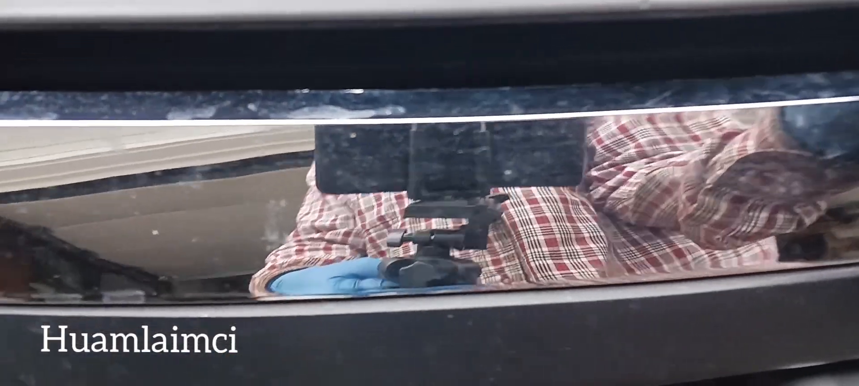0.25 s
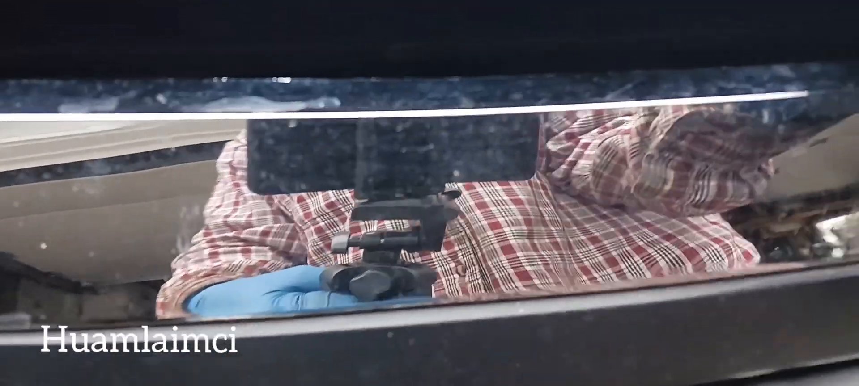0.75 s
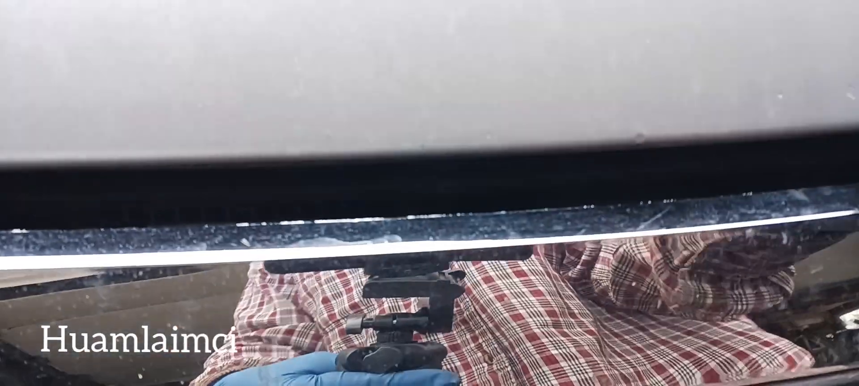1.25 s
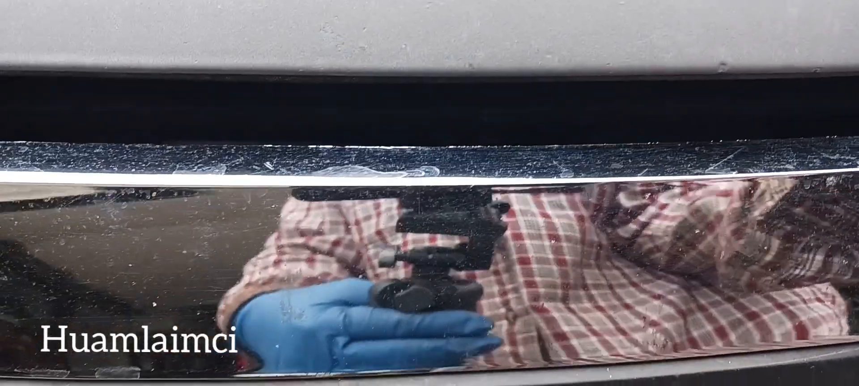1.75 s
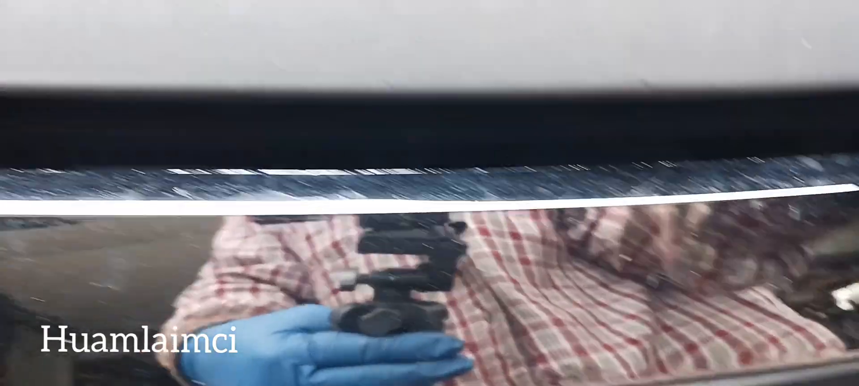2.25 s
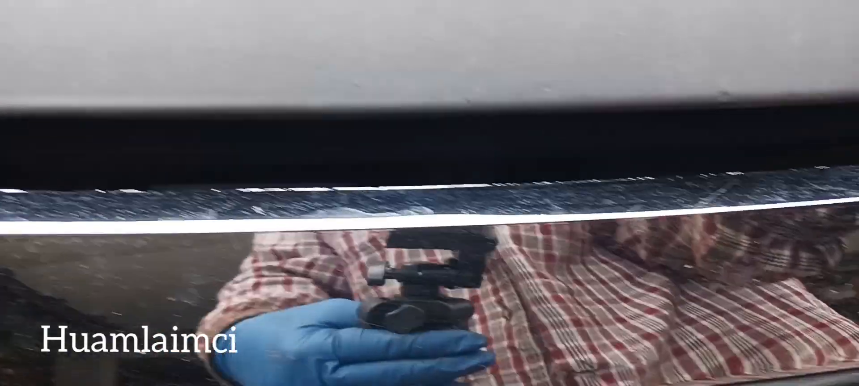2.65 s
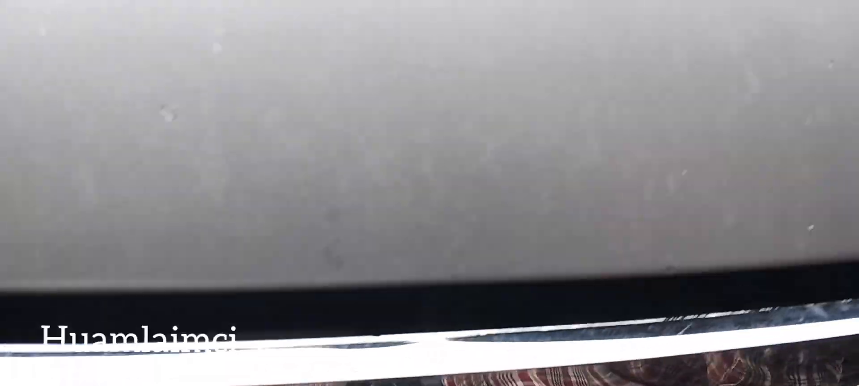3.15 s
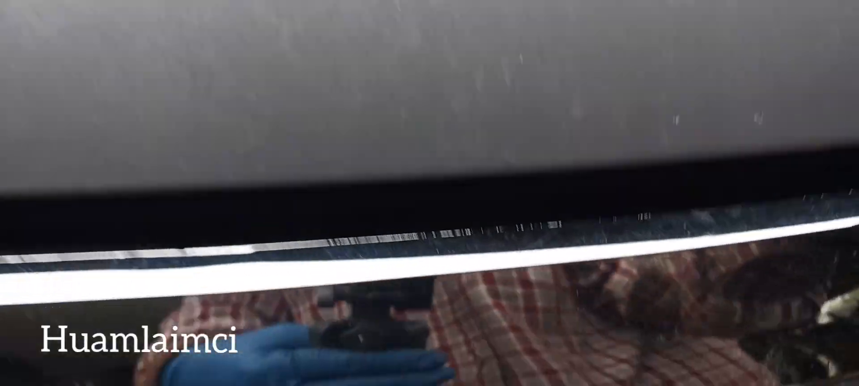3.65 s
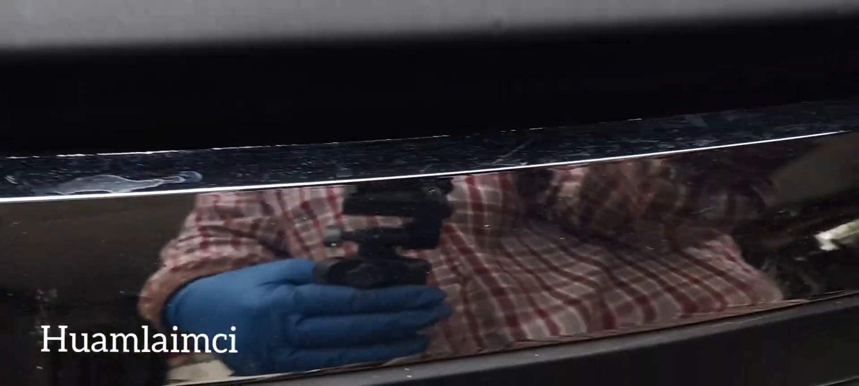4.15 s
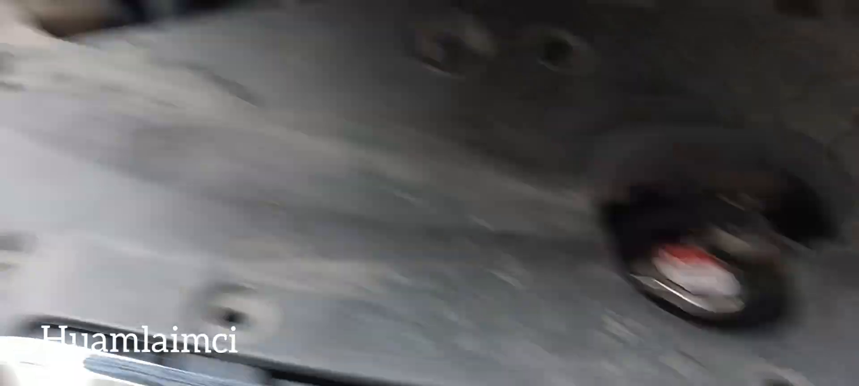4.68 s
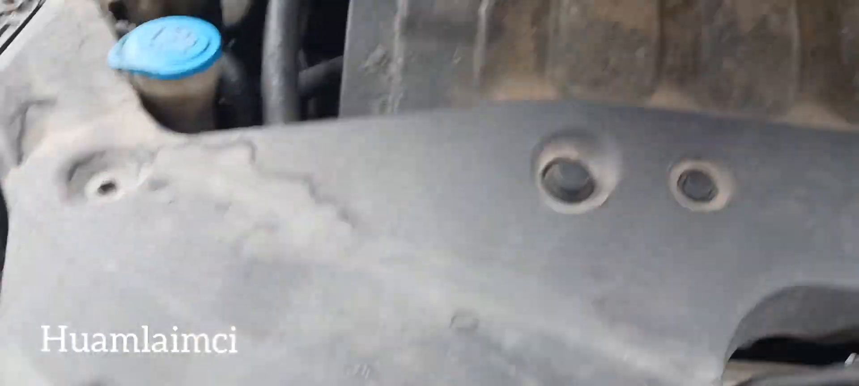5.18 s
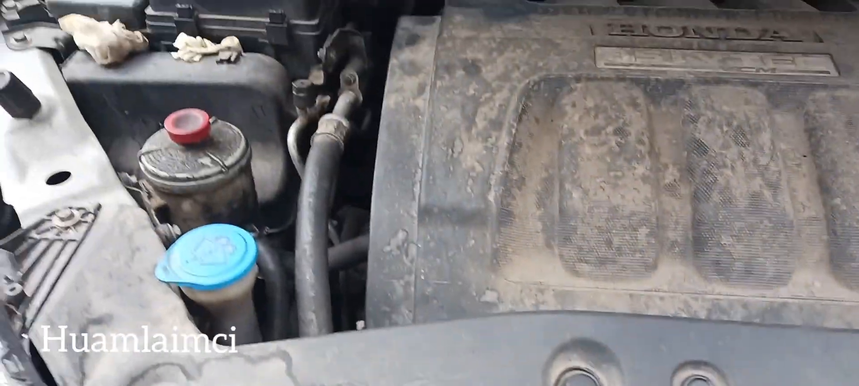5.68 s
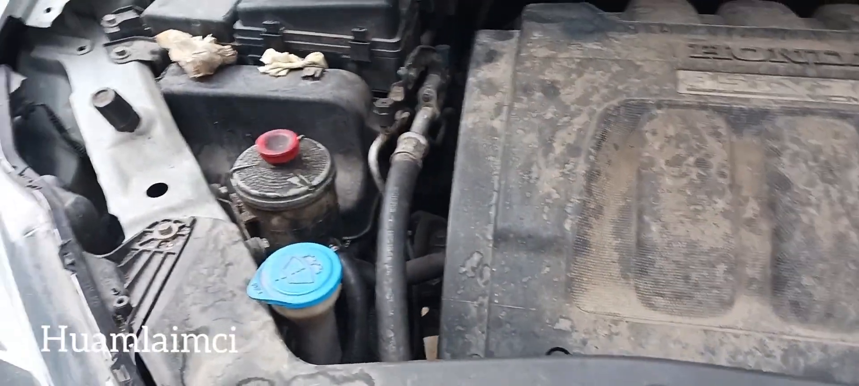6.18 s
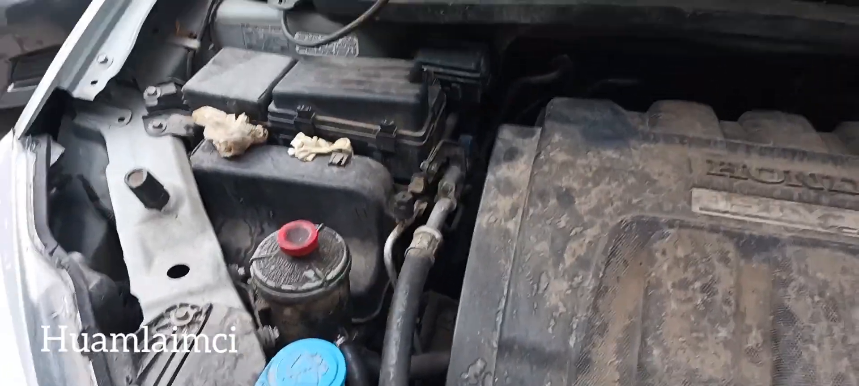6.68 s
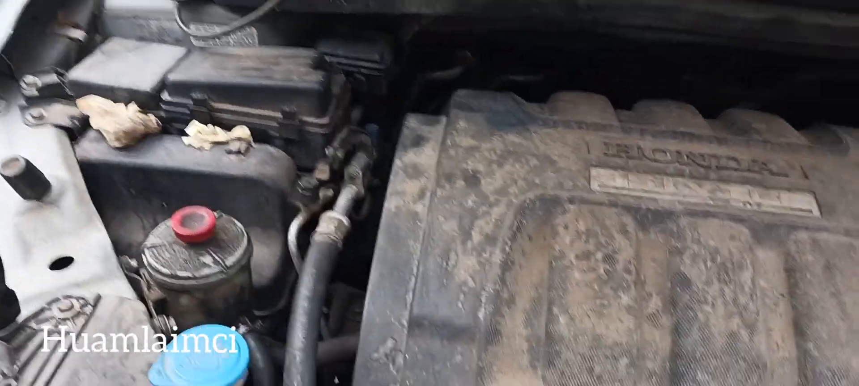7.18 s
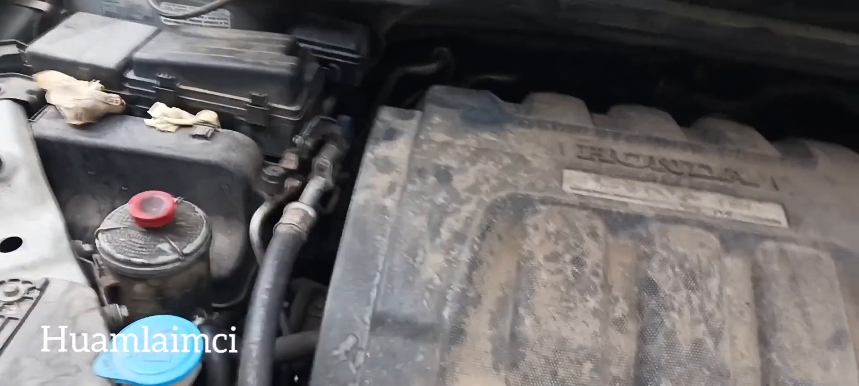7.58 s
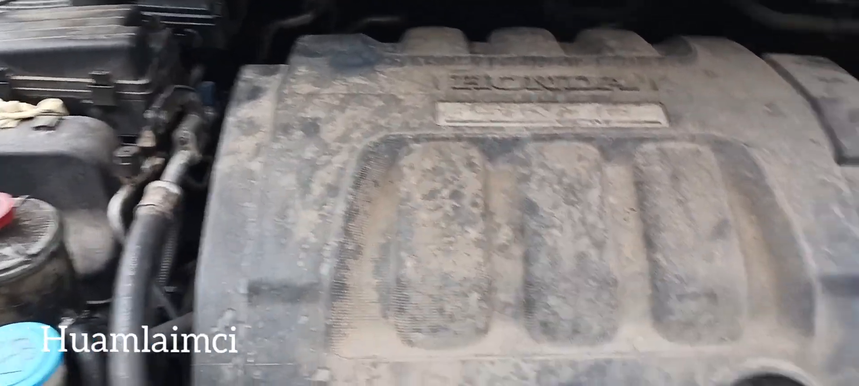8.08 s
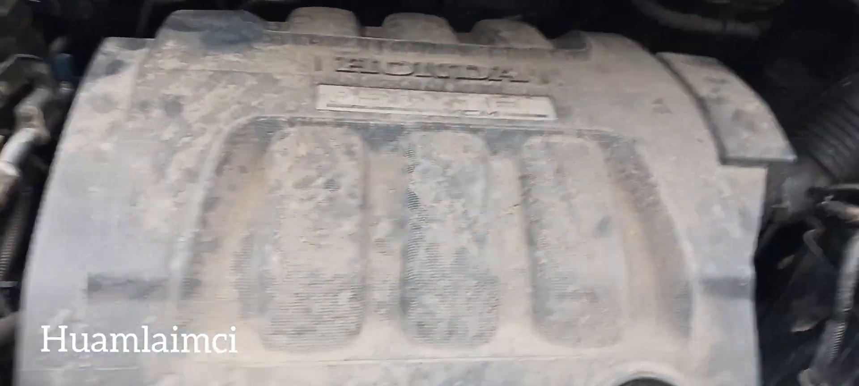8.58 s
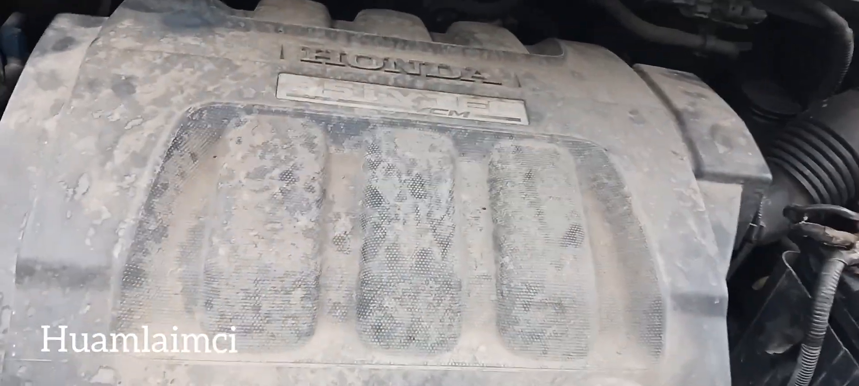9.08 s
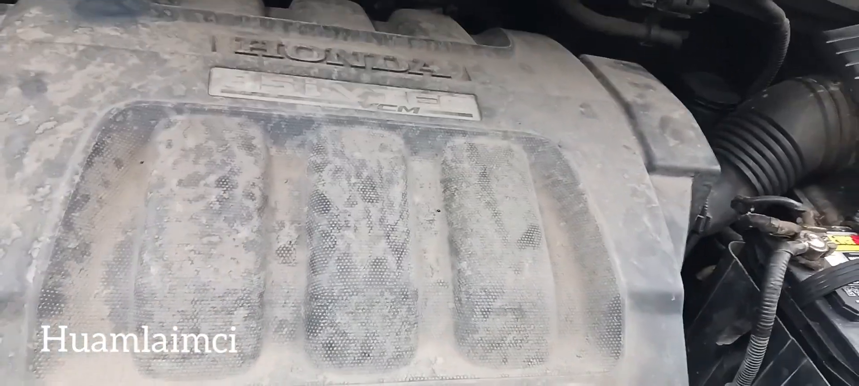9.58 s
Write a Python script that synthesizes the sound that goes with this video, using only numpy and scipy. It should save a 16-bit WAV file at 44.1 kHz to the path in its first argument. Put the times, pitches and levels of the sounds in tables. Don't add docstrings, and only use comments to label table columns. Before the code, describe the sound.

Outdoors, wind rumbles unevenly on a close handheld stereo microphone over soft distant traffic. At 0 s a lever's spring is already ringing, bright and metallic, slightly left. A heavy hollow hood thump lands at 0.5 s, then a sharper double clunk around 0.8 to 0.95, right of center. The lever twangs again at 1.3. Duller, bouncing thuds come at 1.9, 2.25, 2.55 and 2.85, with a low swaying hum. A strong ringing clank hits at 3.2 and a softer spring snap at 3.6. At 4.1 a thud leads into a rapid, bright release clatter near 4.3, with loose ticks until 4.8. Brief hinge squeaks sound about 5.1. Afterwards it is quieter: faint bird whistles around 6.2 to 7.7, a barely audible insect buzz from 2.75 to 6.7, sharp small ticks near 7.5 and 8.7, and light scuffs up to 9.7.

```python
import sys
import numpy as np
from scipy import signal
from scipy.fft import rfft, irfft
from scipy.io import wavfile
from scipy.ndimage import uniform_filter1d

SR = 44100
rng = np.random.default_rng(int(sys.argv[2]) if len(sys.argv) > 2 else 0)


def volts_from_decibels(level):
    exponent = np.asarray(level, float) / 20
    return 10 ** exponent


def log_audio(samples):
    frames = np.atleast_2d(samples).T
    limited = np.clip(frames, -1, 1)
    pcm = np.round(limited * 32767).astype(np.int16)
    wavfile.write(sys.argv[1], SR, pcm)


N = 433503


def evened(x):
    return x / np.sqrt(np.mean(x ** 2) + 1e-20)


def read(points, hz):
    f, value = np.transpose(points)
    return np.interp(np.log(hz + 1), np.log(f + 1), value)


def columns(rows, t):
    s, *rest = np.transpose(rows)
    return [np.interp(t, s, c) for c in rest]


def add(mix, s, sound, pan_db=0):
    part = mix[:, round(s * SR):][:, :sound.shape[-1]]
    lean = volts_from_decibels(np.array([[pan_db / 2], [-pan_db / 2]]))
    part += (sound * lean)[:, :part.shape[1]]


def wander(count, smooth):
    once = uniform_filter1d(rng.standard_normal(count), int(smooth))
    return evened(uniform_filter1d(once, int(smooth)))


def stroke(length, db, fade_db, rise, fall):
    t = np.arange(0, length, 1 / SR)
    ends = np.clip(np.minimum(t / rise, (length - t) / fall), 0, 1)
    return t, volts_from_decibels(db + fade_db * t / length) * np.sin(np.pi / 2 * ends) ** 2


def two_ports(left, other, same, hz):
    like = np.clip(read(same, hz), -1, 1).reshape((-1,) + (1,) * (left.ndim - 1))
    return left, like * left + np.sqrt(1 - like ** 2) * other


# (f/Hz, left-right level/dB)
PORT_TILT = [(60, 3.5), (180, 1), (550, 3.5), (1650, 6), (4970, 3), (15000, 10)]


def field(spectrum, same, patchy_db, size):
    frames, hz = 4 * N // size + 5, np.fft.rfftfreq(size, 1 / SR)
    a, b, c, d, patches = rng.standard_normal((frames, len(hz), 5), dtype=np.float32).T
    patches = evened(uniform_filter1d(uniform_filter1d(patches, 8, axis=0), 10, axis=1))
    z = np.array(two_ports(a + 1j * b, c + 1j * d, same, hz))
    z = z * volts_from_decibels(read(spectrum, hz)[:, None] + patchy_db * patches)
    z = z * volts_from_decibels(np.multiply.outer([0.5, -0.5], read(PORT_TILT, hz)))[:, :, None]
    return evened(signal.istft(z, nperseg=size, noverlap=3 * size // 4)[1][:, :N])


def modes(table, t, spread_db, blur, count=4):
    hz, db, t60 = np.transpose(table)[:, :, None]
    luck = rng.standard_normal((2, 2, len(table)))
    phase = 2 * np.pi * rng.random((count, len(table), 1))
    near = hz * (1 + blur * rng.standard_normal((count, len(table), 1)))
    lines = np.sin((2 * np.pi * near * t + phase).astype(np.float32)).sum(axis=0) / np.sqrt(count)
    rings = volts_from_decibels(db - 60 * t / t60) * lines
    caught = volts_from_decibels(spread_db * (luck[0, :1] + 0.5 * luck[1]))
    return caught @ rings / np.sqrt(np.sum(volts_from_decibels(2 * db)))


BANDS_HZ = np.geomspace(60, 15000, 12)
# (f/Hz, t60/s)
RING_T60 = [(100, 0.52), (300, 0.49), (800, 0.22), (2000, 0.38), (5000, 0.24), (12000, 0.12)]
# (f/Hz, t60/s)
CRACK_T60 = [(300, 0.096), (1500, 0.076), (6000, 0.03), (14000, 0.06)]
# (f/Hz, level per band/dB)
COLOUR = [(120, -7.5), (250, 0.53), (500, 0), (900, -3.5), (2000, -2), (4000, 4), (8000, -7.5), (12500, 0),
          (15000, -0.5)]
# (f/Hz, left-right level/dB)
HIT_TILT = [(60, -1), (180, -5), (550, -6), (1650, 0.5), (4500, -0.5), (8000, 2.5), (12000, 6.5)]
# (f/Hz, likeness 0-1)
HIT_SAME = [(60, .9), (180, .93), (550, .5), (1100, .25), (3000, .55), (15000, .6)]
PORT_LAG_S = 0.00011
SNAP_DB, SNAP_T60 = 3.5, 0.008
ECHO_DB, ECHO_T60 = -25.5, 0.95
SWELL_CYCLES = 0.6


def blow(boom_db, knock_db, crack_db, stretch, tail_db, knock_hz, count):
    t, hz = np.arange(count) / SR, np.fft.rfftfreq(count, 1 / SR)
    left, other = rfft(rng.standard_normal((2, count)))
    near, far = two_ports(left, other, HIT_SAME, hz)
    ports = np.array([near * np.exp(-2j * np.pi * hz * PORT_LAG_S), far])
    ports = ports * volts_from_decibels(3.1 * wander(len(hz), 45.0 * count / SR))
    rattle = volts_from_decibels(1.1 * wander(count, 90))
    tilt_db = read(HIT_TILT, BANDS_HZ) - read(HIT_TILT, 340)
    lean = volts_from_decibels(np.multiply.outer(tilt_db, [[0.5], [-0.5]]))
    place = np.interp(np.log(hz + 1), np.log(BANDS_HZ), np.arange(len(BANDS_HZ)))
    air_db = crack_db + 0.17 * (crack_db - boom_db)
    strength = [(300, boom_db), (knock_hz, knock_db), (3500, crack_db), (11000, air_db)]
    level_db = read(strength, BANDS_HZ) + read(COLOUR, BANDS_HZ)
    contact = 0.00021 + 0.0043 * np.clip((boom_db - crack_db) / 30, 0, 1)
    snap = volts_from_decibels(SNAP_DB - 60 * t / SNAP_T60)
    echo = volts_from_decibels(tail_db + ECHO_DB - 60 * t / (stretch * ECHO_T60))
    out = np.zeros((2, count))
    for k, f in enumerate(BANDS_HZ):
        window = np.cos(np.pi / 2 * np.clip(place - k, -1, 1))
        band = evened(irfft(ports * window, count))
        crack = volts_from_decibels(-60 * t / read(CRACK_T60, f))
        ring = volts_from_decibels(tail_db - 60 * t / (stretch * read(RING_T60, f)))
        swell = 1 - np.exp(-t / (contact + SWELL_CYCLES / f))
        out += volts_from_decibels(level_db[k]) * lean[k] * band * rattle * (snap + crack + ring + echo) * swell
    return out


# (t/s, level/dB)
GUSTS = [(0.0, -48), (0.3, -53), (0.5, -46.5), (1.83, -47.5), (2.79, -47), (3.6, -52.5), (4.1, -59),
         (4.3, -50), (4.7, -48.5), (5.86, -53), (6.49, -45.5), (6.71, -48), (7.47, -51), (8.02, -46),
         (8.73, -47.5), (9.01, -46), (9.5, -48)]
# (f/Hz, level per Hz/dB)
WIND = [(12, -41), (20, -13.5), (43, 1.5), (88, 0.5), (156, -29.5), (261, -21.5), (400, -29), (600, -79)]
# (f/Hz, level per Hz/dB)
AIR = [(130, -4), (250, -18.5), (570, -26.5), (1000, -18), (2250, -31.5), (3000, -41), (6500, -48),
       (14000, -42)]
# (f/Hz, likeness)
AIR_SAME = [(60, 0.32), (240, 1), (950, -0.3), (3770, 0.15), (15000, 0.22)]
AIR_DB = -63.5


def outdoors():
    gust_db, = columns(GUSTS, np.arange(N) / SR)
    rumble = field(WIND, [(30, 0.4), (150, 0.6)], 1.5, size=4096) * volts_from_decibels(3.8 * wander(N, 2100))
    wash = field(AIR, AIR_SAME, 1.4, size=1024) * volts_from_decibels(0.9 * wander(N, 9000))
    wind = volts_from_decibels(gust_db + 4.0) * evened(rumble) * volts_from_decibels(np.array([[-4.5], [1.5]]))
    return wind + volts_from_decibels(AIR_DB + 9.5) * wash


# (t/s, level/dB, left-right level/dB, clack level over the spring/dB, rise/s)
SNAPS = [
    (-0.015, -31, 6, -8.5, 0.004),
    (1.3308, -31, 4.5, -20.5, 0.004),
    (3.587, -28, 6.5, -12.5, 0.0055),
]
# (f/Hz, level/dB, t60/s)
SPRING = [(2830, -26, 0.36), (3140, -12.5, 0.4), (3450, -18, 0.66), (3630, -6.5, 0.65), (3830, -5, 0.45),
          (3900, -11, 0.43), (4360, -3.5, .3), (4490, 7, 0.021), (4930, -14.5, 0.16), (5570, -11, 0.14),
          (7130, -10, 0.17), (7500, -18, 0.38), (8350, -26, 0.19), (9400, -19, 0.27)]
# (f/Hz, level/dB, t60/s)
CLACK = [(354, -9, 0.12), (480, 18.5, 0.43), (530, 13.5, 0.46)]
SLIP_DB = [5, -5, -6, -11]
SLIP_HZ, SLIP_DROP, SLIP_S, SLIP_T60 = 3870, 0.47, 0.00377, 0.079


def lever():
    out, t = np.zeros((2, N)), np.arange(26000) / SR
    for s, db, pan_db, clack, rise in SNAPS:
        plate = modes(CLACK, t, 1.0, 0.045)
        ring = volts_from_decibels(db) * (modes(SPRING, t, 2.8, 0.021, count=10) + volts_from_decibels(clack) * plate)
        clash = 1 + 1.94 * np.exp(-t / 0.0097)
        ring = ring * clash * (1 - np.exp(-(t / 0.013) ** 2))
        slip_hz = SLIP_HZ * (1 + SLIP_DROP * np.exp(-t / SLIP_S)) * (1 + 0.031 * wander(len(t), 25))
        turns = np.cumsum(slip_hz) / SR
        squeal = sum(volts_from_decibels(h_db) * np.sin(2 * np.pi * (k + 1) * turns) for k, h_db in enumerate(SLIP_DB))
        ring = ring + volts_from_decibels(db - 0.37 * (clack + 19.0) - 60 * t / SLIP_T60) * squeal
        slap = blow(db - 20.0, db - 38.0, db - 20.0, 1.0, -4, 2800, count=len(t))
        snap = (ring + slap) * (1 - np.exp(-(t / rise) ** 2))
        add(out, max(s, 0), snap[:, round(max(-s, 0) * SR):], pan_db)
    return out


# (start t/s,
# length/s, from f/Hz, to f/Hz, level/dB)
WHISTLES = [(0.038, 0.36, 3805, 3684, -79), (1.245, 0.26, 3740, 3720, -76), (1.397, 0.44, 3690, 3630, -77),
            (2.851, 0.3, 4040, 3870, -81.5), (3.083, 0.071, 3620, 3700, -79), (6.17, .09, 3030, 2960, -84),
            (6.25, .1, 2300, 2250, -86), (6.375, .08, 2700, 2400, -82), (6.865, .16, 4120, 4010, -81),
            (6.912, 0.12, 3290, 3070, -74), (6.94, 0.42, 4060, 3820, -79), (7.2, .28, 3870, 3840, -87),
            (7.32, 0.5, 3740, 3630, -80), (7.68, 0.1, 3660, 3580, -82)]
# (start t/s, length/s, from f/Hz, to f/Hz, level/dB)
SQUEAKS = [(5.077, .07, 2405, 2317, -75.5), (5.089, 0.035, 1570, 1560, -76.5),
           (5.089, 0.094, 3320, 3130, -78), (5.174, .14, 3210, 3040, -89), (5.092, .16, 4200, 4070, -84.5),
           (7.0, 0.22, 4320, 4200, -88), (7.738, .1, 4050, 4070, -81.5), (7.813, 0.15, 4300, 4420, -88),
           (8.135, 0.096, 4230, 4340, -88)]
WHISTLE_FADE_DB, WHISTLE_EDGE_S = -2, 0.03
GLIDE_BEND = 0.77
BLUR_S, FLUTTER_S = 0.00093, 0.06
YARD_DB, YARD_T60 = -9, 0.49


def calls():
    out = np.zeros((2, N))
    for (s, length, from_hz, to_hz, db), rough in [(w, 0.2) for w in WHISTLES] + [(w, 1.2) for w in SQUEAKS]:
        t, shape = stroke(length, db, WHISTLE_FADE_DB, min(WHISTLE_EDGE_S, length / 3), 0.58 * length)
        hz = from_hz + (to_hz - from_hz) * (t / length) ** GLIDE_BEND
        waver = (0.0026 + rough * BLUR_S / length) * wander(len(t), 37.8)
        tremble = 0.0033 * np.sin(2 * np.pi * t / 0.483)
        turns = np.cumsum(hz * (1 + waver + tremble)) / SR
        tone = np.sin(2 * np.pi * (turns + rng.random() + np.array([[0], [0.12]])))
        tone = tone * volts_from_decibels(16.5 + 4.0 * wander(len(t), 710))
        flutter = 1 + (0.35 + rough * FLUTTER_S / length) * wander(len(t), 81)
        add(out, s, shape * tone * flutter)
    t = np.arange(SR // 3) / SR
    sparse = rng.random((2, len(t))) < 0.02
    yard = rng.standard_normal((2, len(t))) * sparse * volts_from_decibels(-60 * t / YARD_T60)
    echoes = signal.oaconvolve(out, yard / np.linalg.norm(yard[0]), axes=1)[:, :N]
    return volts_from_decibels(-5.0) * out + volts_from_decibels(YARD_DB) * echoes


# (t/s, crack level/dB, boom level over crack/dB, knock level over crack/dB, left-right level/dB)
TICKS = [(0.2543, -42, 8, -10, 3), (0.3387, -50, 10, -7, 2), (1.0, -39.5, 14, 23, 5),
         (1.1292, -50, -5, 8, 4.5), (1.482, -43, 9, -3, -4), (1.8783, -47.5, 19.5, -45, 0),
         (1.9905, -48.5, 24, 23.5, 0), (3.066, -44.5, -6, -4, -9), (4.055, -43, 4, 1, 1),
         (4.4581, -53, -5, 12, -6), (4.4842, -37, -14, 1, -9), (4.557, -36, -1, 3, -7),
         (4.608, -38.5, 13, 2, -5), (5.055, -58, 23, 3, -1), (5.1258, -53.5, 13, 11, -5),
         (5.371, -47.5, -14, -69, 1), (7.5073, -50.5, -1, 20, -2), (7.5396, -34.5, -5.5, -1.5, -0.5),
         (8.4867, -78.5, 47.5, -26, -12), (8.649, -38, -15, 24, -7), (8.6744, -44.5, 2, 19, 1),
         (8.788, -35, -10.5, -20, -3), (9.2751, -58.5, 11, 27.5, 0.5), (9.4586, -50.5, 1, 17, -0.5),
         (0.171, -53, 0, 3, 0), (0.261, -45, -9, -3, -1.5), (0.38, -55, -2, -12, 0),
         (4.497, -35, -10, -1, -8), (4.719, -48, 10, -8, -6), (1.682, -57, -14, -32, -3),
         (9.32, -56, -10, -30, 2), (9.019, -60, -10, -30, 0)]
TICK_RING = 0.578


def ticks():
    out = np.zeros((2, N))
    for s, db, boom, knock, pan_db in TICKS:
        tick = blow(db + boom - 18.5, db + knock - 18.5, db - 17.0, TICK_RING, -9.5, 1320, count=6144)
        add(out, s, tick, pan_db)
    return out


# (start t/s, length/s, level/dB, fade over the length/dB, f/Hz)
SWAY = [
    (0.207, 0.57, -49.5, 9.5, 83.5),
    (0.858, 0.19, -37, -5, 67),
    (1.024, 0.775, -44.5, -2.5, 82.45),
    (1.918, 1.08, -35.5, -10.5, 70),
]
SWAY_RISE_HZ, SWAY_EDGE_S = 4, 0.036


def sway():
    out = np.zeros((2, N))
    for s, length, db, fade_db, hz in SWAY:
        t, shape = stroke(length, db + 4.0, fade_db, SWAY_EDGE_S, SWAY_EDGE_S)
        add(out, s, shape * np.sin(2 * np.pi * (hz + SWAY_RISE_HZ * t / length / 2) * t), -1.5)
    return out


# (t/s, level/dB, f/Hz, t60/s)
PUSHES = [(0.537, -29, 103, 0.11), (0.945, -3, 113, 0.037), (1.922, -28, 107, 0.21),
          (2.554, -20, 63.4, 0.18), (2.85, -37, 75.2, 0.44), (4.087, -19.5, 74.2, 0.25),
          (4.291, -13.5, 67, 0.093), (5.12, -28.5, 70, 0.17), (6.45, -18.5, 67.2, 0.081),
          (6.998, -31, 65.6, 0.18), (8.479, -14, 129, 0.041), (5.003, -34, 141.7, 0.12),
          (4.681, -32.5, 150, 0.077), (8.899, -24.5, 60.7, 0.14)]


def air_pushes():
    out, t = np.zeros((2, N)), np.arange(24576) / SR
    for s, db, hz, t60 in PUSHES:
        fall = volts_from_decibels(db + 0.56 - 60 * t / t60)
        add(out, s, fall * np.sin(2 * np.pi * hz * t) * (1 - np.exp(-t / 0.0078)), -2.5)
    return out


HOOD_PAN_DB = -3
BRIGHT_LEAN = 0.11
# (t/s, panel boom level/dB, knock level over boom/dB, crack level over boom/dB, ring length factor)
KNOCKS = [(0.539, -13.5, -2, -23.5, 1), (0.559, -30, -38.5, -22.5, 0.28), (0.779, -21.5, -6, -32, 1.6),
          (0.7979, -18.5, 8.5, -9, 1.32), (0.805, -8, -4, -14.5, 0.59), (0.943, -15, -5, -21, 1.13),
          (1.924, -17, -2.5, -30, 1), (1.945, -18, -12, -36, 0.78), (2.248, -21, -35, -36.5, 0.86),
          (2.553, -11, -4, -29.5, 0.66), (2.574, -19.5, -4, -30.5, 1.14), (2.834, -18.5, -25, -52, 0.87),
          (2.87, -24, -5, -48.5, 0.71), (3.162, -23, -19, -32, 0.95), (3.1759, -11, 2.5, -13, 1.04),
          (4.091, -15, -6, -29.5, 0.99), (4.111, -14.5, -27, -30.5, 0.4), (4.267, -38, -7, 0.5, 0.67),
          (4.275, -24.5, -5.5, -7.5, 0.5), (4.28, -10.5, -1, -20.5, 0.18), (4.3043, -24, -5, 8, 1.12),
          (4.3106, -21.5, 6, -8.5, 1.72), (4.333, -20.5, 8, -20.5, 0.51), (4.817, -32.5, 0.6, -9.5, 0.75)]
# (f/Hz, level/dB, t60/s)
PANELS = [
    [(227.5, -2.5, 0.34), (370.3, -2, 0.41), (437, -8, 0.5), (619, -11, 0.3), (826, -13.5, 0.28),
     (1063, -10, 0.245), (1224, -11.5, 0.23), (1305, -16, 0.23)],
    [(138.6, -20.5, 0.6), (217, 22.5, 1.02), (275, -26.5, 0.76), (382, -15, 0.8), (399, -26, 0.22),
     (694, -15, 4), (754, 16, 0.45), (1116, -6, 1.3), (1363, -13.5, 0.13)],
    [(130, -8, 0.51), (179, -6.5, 0.27), (285, -11, 1), (466.5, -22.5, 0.44), (603, -21, 0.18),
     (764, -39, 0.3), (1060, -22, 0.29), (1246, -30.5, 0.2)],
]
STATE_S = [3.0, 4.0]


def knocks():
    out, t = np.zeros((2, N)), np.arange(24576) / SR
    for s, boom_db, knock, crack, stretch in KNOCKS:
        state = PANELS[np.searchsorted(STATE_S, s)]
        panel = [(hz, db + read([(300, 0.019), (700, knock + 4)], hz), t60) for hz, db, t60 in state]
        skin = modes(panel, t, 1.5, 0.02)
        skin = volts_from_decibels(boom_db - 9.5 - 30 * t / stretch) * skin * (1 - np.exp(-t / 0.0042))
        give = (t / 0.0036) * np.exp(-t / 0.0028)
        thump = -volts_from_decibels(boom_db - 9.0 - 0.33 * max(crack + 20, 0)) * np.sin(2 * np.pi * 500.0 * t) * give
        tail_db = -5 - 0.21 * max(crack + 8, 0)
        hit = blow(boom_db - 13.0, boom_db + knock - 11, boom_db + crack - 7.5, stretch, tail_db, 680, len(t))
        add(out, s, hit + skin + thump, HOOD_PAN_DB + BRIGHT_LEAN * (crack + 20))
    return out


# (t/s, level/dB, kick-back level/dB)
SQUASHES = [
    (0.543, -14, -12.5),
    (1.9277, -14.5, -12.5),
    (2.255, -30.5, -38),
    (2.557, -12.5, -8),
    (2.838, -21.5, -28),
]
KICK_S, STOP_HZ, STOP_S = 0.0196, 313, 0.0018


def rubber_stop():
    out = np.zeros((2, N))
    u = (np.arange(600) - 300) / SR
    give = np.cos(2 * np.pi * STOP_HZ * u) * np.exp(-(u / STOP_S) ** 2)
    for s, db, kick_db in SQUASHES:
        add(out, s + u[0], -volts_from_decibels(db) * give, HOOD_PAN_DB)
        add(out, s + u[0] + KICK_S, volts_from_decibels(kick_db) * give, HOOD_PAN_DB)
    return out


# (struck t/s, damped
# t/s, f/Hz, level/dB, t60/s)
RINGING_PARTS = [(0.798, 1.05, 2340, -50, .9), (.97, 1.17, 4090, -63, 2), (3.19, 3.66, 662, -39.5, 1.7),
                 (3.182, 3.628, 436, -42, 1), (3.179, 3.617, 2375, -46, 1), (3.18, 3.6, 3760, -55, 1.1),
                 (4.31, 4.95, 2290, -46, 1.5), (4.305, 4.95, 2320, -49, 1.5), (4.305, 4.54, 441, -37, .7),
                 (.803, 0.947, 544, -21, 0.3), (3.176, 3.33, 536, -18, 0.22), (3.18, 3.4, 215, -22, .55),
                 (3.18, 3.3, 377, -23, 0.34), (3.18, 3.3, 603, -21, .24), (3.18, 3.3, 705, -23, .26),
                 (3.176, 3.29, 781, -22, 0.19), (.802, .9, 2676, -28, .13), (.802, .9, 2170, -30, .12),
                 (.802, .9, 2955, -31, .15), (.803, .93, 1087, -30, .25), (3.176, 3.2, 5090, -15, 0.03),
                 (4.305, 4.42, 540, -20, 0.3), (4.305, 4.42, 343, -22, .3), (4.305, 4.4, 615, -26, .25),
                 (4.305, 4.4, 2230, -30, .2), (.944, 1.04, 225, -18, 0.36), (4.305, 4.4, 1140, -30, 0.25),
                 (4.305, 4.4, 5300, -34, .15),
                 (.7985, .83, 5350, -21, .035), (.911, .93, 8000, -54, .06), (4.2765, 4.3, 3270, -26, .03),
         (4.281, 4.3, 4600, -30, .04), (4.3045, 4.33, 7450, -19, .02), (4.3045, 4.33, 4900, -19, .035),
         (4.4815, 4.52, 1150, -35, .07), (4.486, 4.52, 1600, -38, .05), (4.552, 4.58, 1300, -38, .05),
         (4.556, 4.58, 1760, -34, .035), (4.606, 4.635, 1270, -33, .05), (4.653, 4.68, 820, -45, .06),
         (4.466, 4.48, 3000, -44, .03), (3.594, 3.66, 545, -36, .2)]
PART_BLUR = 3e-6


def latch_parts():
    out = np.zeros((2, N))
    for s, damped, hz, db, t60 in RINGING_PARTS:
        t = np.arange(0, damped - s, 1 / SR)
        note = modes([(hz, 0, t60)], t, 0.22, PART_BLUR * hz, count=1 if hz < 1000 else 6)
        ends = np.minimum(t / 0.00053, 1) * np.minimum((t[-1] - t) / 0.018, 1)
        add(out, s, volts_from_decibels(db) * note * ends)
    return out


# (start t/s, length/s, level/dB, fade over the length/dB, low part level over it/dB)
SCUFFS = [(1.168, 0.23, -75.5, 21, -6), (1.348, 0.25, -71, 7, -5.5), (2.786, 0.21, -76.5, 13, 11.5),
          (2.958, 0.34, -71, 16.5, -11), (4.478, 0.038, -43, -11, -3), (4.633, 0.11, -64.5, 13.5, -12),
          (5.055, 0.23, -80, -2, 14), (5.089, 0.094, -86, -7, -6), (6.751, 0.13, -60, 4.5, -10),
          (7.503, 0.13, -73, -9, 11), (8.549, 0.15, -62, 13, -14), (8.673, 0.23, -66.5, 4, 0.5),
          (9.006, 0.3, -76.5, 9, -9), (9.138, 0.14, -56.5, -4, -14), (9.247, 0.52, -74, -16, 2)]
# (f/Hz, level per Hz/dB)
SCUFF = [(880, -42), (1500, 0), (2200, -4.5), (3900, -2.5), (5500, -8), (12800, -11.5), (15900, -19),
         (16400, -40.5)]
SCUFF_RISE_S, SCUFF_FALL = 0.019, 0.83


def scuffs():
    out = np.zeros((2, N))
    high = field(SCUFF, AIR_SAME, 0.33, size=256)
    low_band = signal.butter(2, [800, 1250], "band", fs=SR, output="sos")
    low = signal.sosfilt(low_band, rng.standard_normal((2, N)))
    grain = volts_from_decibels(1.4 * wander(N, 78))
    high, low = evened(high * grain), evened(low * grain)
    for s, length, db, fade_db, low_db in SCUFFS:
        t, shape = stroke(length, db, fade_db, SCUFF_RISE_S, SCUFF_FALL * length)
        at = slice(round(s * SR), round(s * SR) + len(t))
        add(out, s, shape * (volts_from_decibels(5.5) * high[:, at] + volts_from_decibels(low_db + 10.5) * low[:, at]), 3.1)
    return out


# (start t/s, length/s, f/Hz)
INSECT = (2.75, 3.95, 5850)
INSECT_DB, INSECT_SWELL_DB = -83, 5.5


def insect():
    out = np.zeros((2, N))
    start, length, hz = INSECT
    t, shape = stroke(length, INSECT_DB, INSECT_SWELL_DB, 0.14, 0.18)
    buzz = evened(uniform_filter1d(rng.standard_normal((2, len(t))), 90, axis=1))
    add(out, start, volts_from_decibels(3.5) * shape * buzz * np.sin(2 * np.pi * hz * t))
    return out


def scene():
    hood = sway() + air_pushes() + knocks() + rubber_stop() + latch_parts()
    return outdoors() + lever() + calls() + ticks() + hood + scuffs() + insect()


def low_pass(x):
    return signal.sosfilt(signal.butter(12, 16810, fs=SR, output="sos"), x)


def record(dry):
    limit = 0.9
    limited = limit * np.tanh(dry / limit)
    treble_edge = signal.ellip(8, 0.5, 60, 15750, fs=SR, output="sos")
    bass_cut = signal.butter(3, 36.0, "high", fs=SR, output="sos")
    mix = signal.sosfilt(bass_cut, signal.sosfilt(treble_edge, limited))
    return low_pass(mix)


dry = scene()
out = record(dry)
log_audio(out)
```